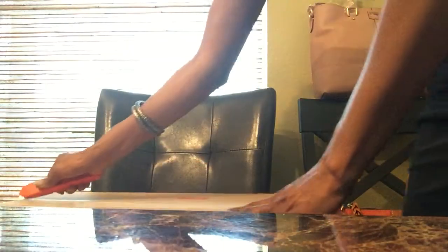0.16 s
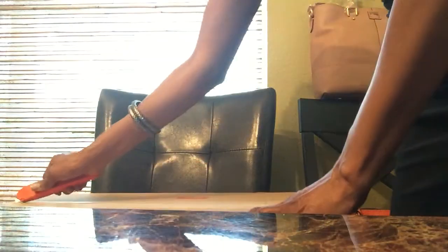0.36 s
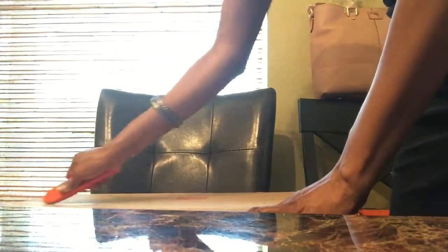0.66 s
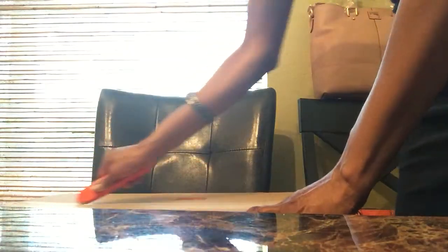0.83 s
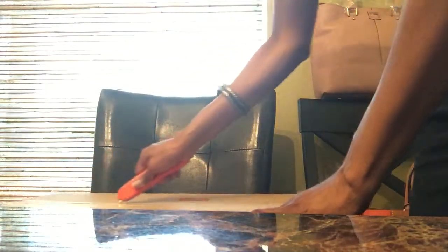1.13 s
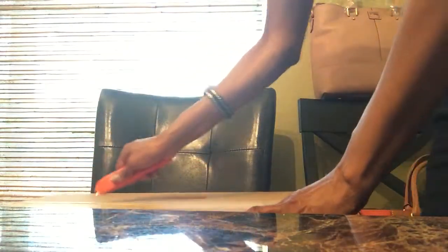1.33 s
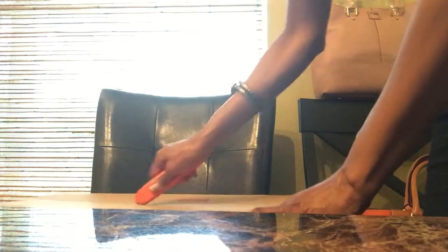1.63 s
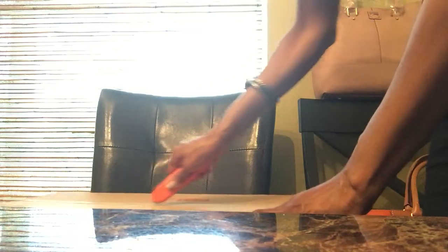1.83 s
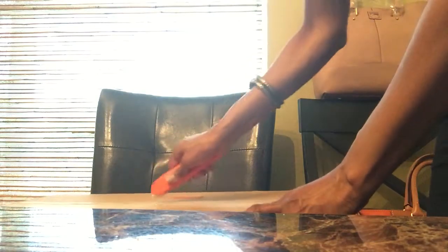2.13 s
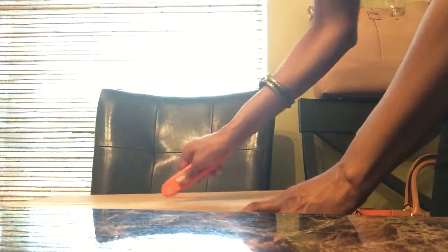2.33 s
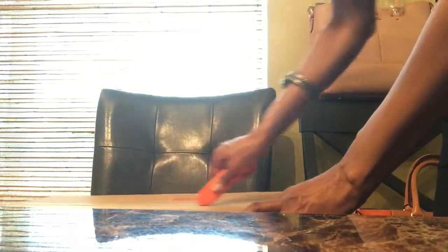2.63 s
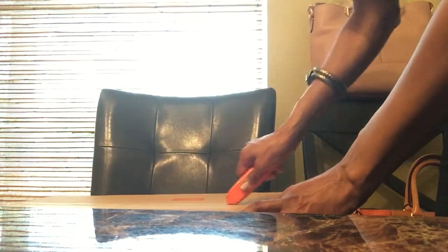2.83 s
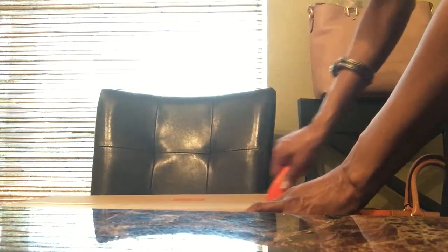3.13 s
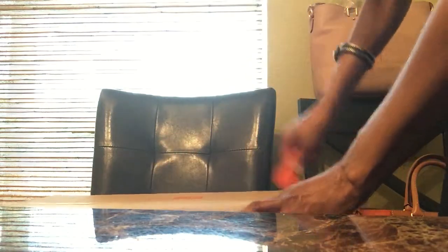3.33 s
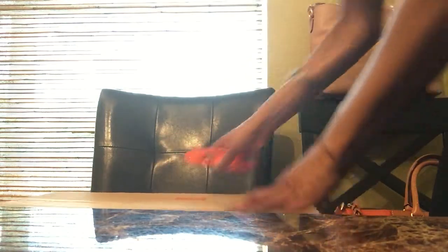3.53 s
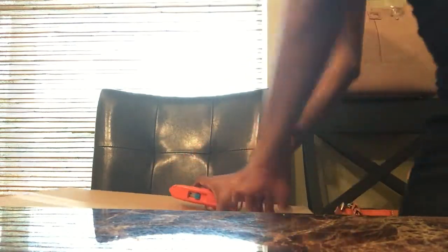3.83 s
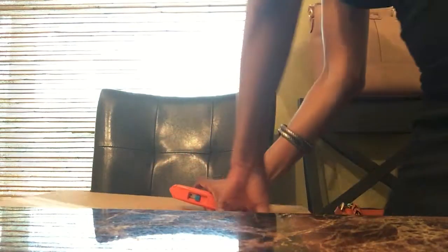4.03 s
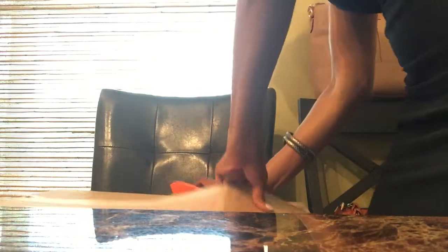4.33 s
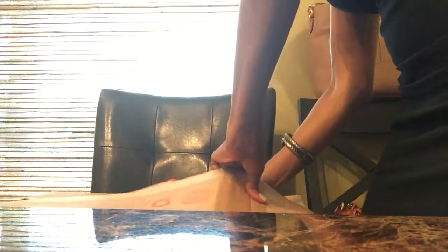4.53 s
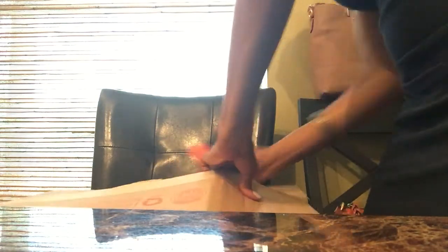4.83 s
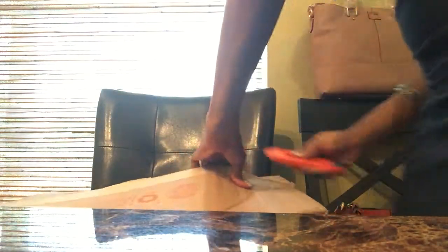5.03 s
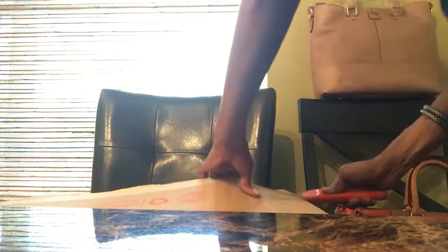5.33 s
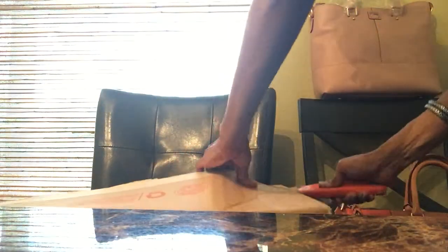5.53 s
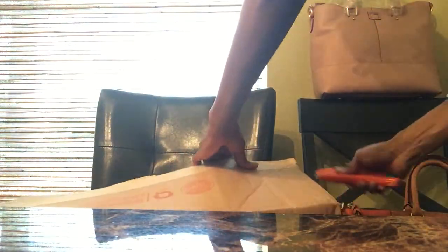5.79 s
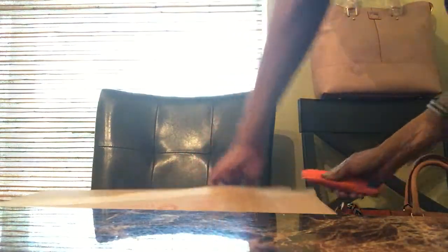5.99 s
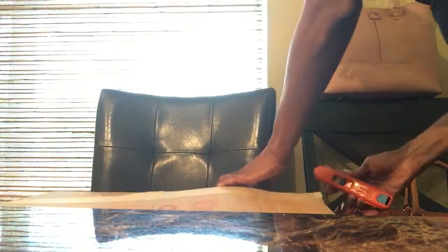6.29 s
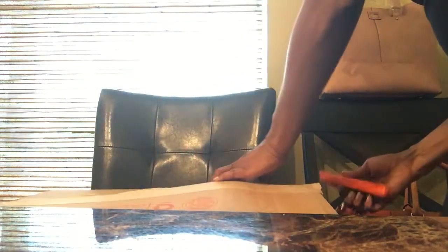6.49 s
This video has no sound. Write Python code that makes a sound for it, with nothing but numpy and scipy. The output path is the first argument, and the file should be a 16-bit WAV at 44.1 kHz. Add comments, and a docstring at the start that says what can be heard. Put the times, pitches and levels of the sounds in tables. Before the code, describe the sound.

In a small room with a faint hum, a nearby microphone picks up a blade ticking against packing tape and slicing along a cardboard box in several dry, scratchy pulls. After a crisp click from the cutter, the cardboard scuffs and flexes as it is tugged open, and the remaining tape gives way in loud, hollow snaps. The board drops with a thud, the cutter clicks again and a metal bangle clinks lightly.

```python
"""A box cutter rasps in strokes through the tape of a flat cardboard box on a stone table.
Hands then pull the box open: the last strands of tape snap, the board buckles, rubs and flops down.
The cutter's slider clicks and a metal bangle clinks on the wrist.
Heard from close by on one small microphone, in a small room with a low hum."""
import sys
import numpy as np
from scipy import signal
from scipy.fft import rfft, irfft, next_fast_len
from scipy.io import wavfile
from scipy.ndimage import uniform_filter1d, map_coordinates

SR = 44100
rng = np.random.default_rng(int(sys.argv[2]) if len(sys.argv) > 2 else 0)


def persist_wave(psi):
    """Save psi, clipped to +-1, as 16-bit WAV."""
    counts = np.round(np.clip(psi, -1, 1) * 32767).astype(np.int16)
    wavfile.write(sys.argv[1], SR, np.atleast_2d(counts).T)


N = 293425


def amp(db):
    """Decibels to gain."""
    return 10 ** (np.asarray(db) / 20)


def unit(x):
    """Scale to rms 1."""
    return x / np.sqrt(np.mean(x ** 2) + 1e-20)


def along(points, hz):
    """Read (frequency, value) points on a log frequency axis."""
    freqs, values = np.transpose(points)
    return np.interp(np.log(hz + 1), np.log(freqs + 1), values)


def wobble(rate):
    """A smooth random curve, rate knots a second."""
    knots = rng.standard_normal(int(N * rate / SR) + 4)
    return map_coordinates(knots, [np.arange(N) * rate / SR])


def add(track, start, sound):
    """Mix a sound into the track, start seconds in."""
    part = track[max(round(start * SR), 0):][:len(sound)]
    part += sound[:len(part)]


def colour(x, points, size=8192):
    """Minimum-phase filter through (frequency [Hz], gain [dB]) points."""
    cepstrum = irfft(np.log(amp(along(points, np.fft.rfftfreq(size, 1 / SR)))))
    cepstrum[1:size // 2] *= 2
    cepstrum[size // 2 + 1:] = 0
    return signal.fftconvolve(x, irfft(np.exp(rfft(cepstrum))))[:len(x)]


def resonance(x, hz, width_hz):
    """x through one resonance whose centre may move."""
    turn = np.exp(2j * np.pi * np.cumsum(hz * np.ones(len(x))) / SR)
    pole = np.exp(-np.pi * width_hz / SR)
    return 2 * (signal.lfilter([1 - pole], [1, -pole], x / turn) * turn).real


def ring(t, modes, scatter_db):
    """Damped modes, struck at new strengths every time."""
    return sum(amp(db + scatter_db * rng.standard_normal() - 60 * t / t60) * np.sin(2 * np.pi * hz * t)
               for hz, db, t60 in modes)


def burst(t, t60, points):
    """A dying cluster of tiny fractures, coloured, with the energy of 10 ms at rms 1."""
    x = colour(rng.choice([-1, 1], len(t)) * amp(-60 * t / t60), points)
    return x / np.linalg.norm(x) * np.sqrt(SR / 100)


def fibres(rate, spread_db):
    """Fibres parting: impulses at random moments with log-normal sizes."""
    impulses = (rng.random(N) < rate / SR) * rng.choice([-1, 1], N)
    return unit(impulses * amp(spread_db * rng.standard_normal(N)))


def moving_contact(x, depth_db, size=1024):
    """The contact moves over the sheet, so its narrow resonances come and go."""
    spectra = signal.stft(x, nperseg=size)[2]
    ripple = rng.standard_normal(spectra.shape)
    for axis, count in ((0, 4), (0, 3), (1, 10), (1, 5)):  # smooth over frequency, then time
        ripple = uniform_filter1d(ripple, count, axis)
    return unit(signal.istft(spectra * amp(depth_db * unit(ripple)), nperseg=size)[1][:N])


# Room tone at the microphone: (frequency [Hz], gain [dB])
ROOM_TONE_COLOUR = [(15, -50), (25, -18), (123, -4), (249, -15.5), (326, -5), (384, -21.5), (476, -25),
                    (714, -23), (2160, -30.5), (2910, -37.5), (3160, -33), (7310, -33), (9840, -39),
                    (14000, -43.5), (16000, -38)]
def room_tone():
    """Steady low hum and faint hiss of the room, behind everything else."""
    return amp(-61.5) * unit(colour(rng.standard_normal(N), ROOM_TONE_COLOUR))


# Reverberation of the small room: (frequency [Hz], t60 [s])
ROOM_DECAY = [(100, 0.27), (400, 0.31), (2000, 0.37), (7000, 0.35), (15000, 0.22)]
def room(x, wet_db, gap_s=0.005):
    """Direct sound from the table, plus a diffuse tail that changes as the hands move about."""
    out, block = x.copy(), SR // 3
    for start in range(0, N, block):
        hz, t, noise = signal.stft(rng.standard_normal(SR // 2), SR, nperseg=256)
        decay = amp(-60 * t / along(ROOM_DECAY, hz)[:, None])
        tail = signal.istft(noise * decay, SR, nperseg=256)[1]
        reverb = signal.fftconvolve(x[start:start + block], tail / np.linalg.norm(tail))
        add(out, start / SR + gap_s, amp(wet_db) * reverb)
    return out


# A sharp crack, of metal here and of tape below: (frequency [Hz], gain [dB])
CRACK_COLOUR = [(300, -25), (1350, -9), (2050, 1), (2900, 5), (4200, 4), (7500, 0), (9500, -11),
                (12000, -6.5), (15500, -13.5)]
# Ringing of the bangle: (frequency [Hz], level [dB], t60 [s])
BANGLE_MODES = [(2230, 8.5, 0.04), (4780, 0, .055), (5700, -7, .025), (6700, 2, 0.034), (7100, -5, .03),
                (7300, 1, 0.063), (9070, -3, 0.045), (10200, -3, .03), (11925, 1, .05), (12600, -12.5, .04),
                (13900, -4, .03)]
# Clinks on the wrist: (time [s], level [dB], favoured frequency [Hz])
BANGLE_CLINKS = [(3.8265, -42.5, 7630), (6.3617, -35, 4820), (6.37, -45.5, 7140), (6.386, -53, 5200),
                 (6.4705, -35.5, 7500), (6.5527, -37.5, 7600)]
def bangle_clinks():
    """Thin metal hoops touch; the point of contact favours some modes."""
    out, t = np.zeros(N), np.arange(SR // 4) / SR
    for start, db, hz in BANGLE_CLINKS:
        metal = amp(-23.5) * ring(t, BANGLE_MODES, scatter_db=2.5)
        metal += amp(-15) * burst(t, 0.012, CRACK_COLOUR)
        add(out, start, amp(db) * (metal + resonance(metal, hz, width_hz=1600)))
    return out


# The cutter's tick: (frequency [Hz], gain [dB])
TICK_COLOUR = [(300, -26.5), (1000, -19.5), (1600, -3.5), (2000, 6.5), (2700, -6), (4000, -0.5), (5500, -3),
               (7400, 1), (9500, -9), (12000, -3.5), (15500, -14.5)]
# Ringing of the cutter: (frequency [Hz], level [dB], t60 [s])
CUTTER_MODES = [(1980, 1.5, 0.25), (2090, 3, .22), (6360, -6, .14), (7560, -3, .18)]
# Clicks of the slider and plastic handle: (time [s], level [dB], treble before a set lift [dB])
CUTTER_CLICKS = [(3.4587, -29, -22), (3.4862, -11, -8), (5.245, -30, -33), (5.9888, -16.5, -25),
                 (6.5337, -38, -27), (6.5445, -31.5, -23.5), (6.5744, -35, -29), (6.6059, -37.5, -29)]
def cutter_clicks():
    """The cutter snaps: a sharp tick and a faint ring, each blow with its own brightness."""
    out, t = np.zeros(N), np.arange(SR // 2) / SR
    for start, db, treble_db in CUTTER_CLICKS:
        tick = amp(-13.5) * burst(t, 0.017, TICK_COLOUR)
        ringing = amp(-38) * ring(t, CUTTER_MODES, scatter_db=1.5)
        add(out, start, amp(db) * colour(tick + ringing, [(3500, 0.0032), (11000, treble_db + 9.5)]))
    return out


# Resonances of the box: (frequency [Hz], width [Hz], level [dB])
BOARD_MODES = [(229, 19, 2.5), (373.8, 49, 6), (622, 86, 3), (744, 200, -6.5), (972, 87, -3),
               (1114, 38, -12), (1262, 106, -4), (1506, 59, -13.5)]
def board(x):
    """The cardboard answers a force x with its damped resonances."""
    size = next_fast_len(len(x) + SR // 4)
    f = np.fft.rfftfreq(size, 1 / SR)
    response = sum(amp(db) * 1j * f * width / (hz * hz - f * f + 1j * f * width)
                   for hz, width, db in BOARD_MODES)
    return irfft(rfft(x, size) * response, size)[:len(x)]


# Scraped surface and deep flexing of the box: (frequency [Hz], gain [dB])
SCRAPE_COLOUR = [(600, -18.5), (1400, -1), (2000, 0.5), (2900, 3.5), (4200, -0.5), (7200, -2), (9500, -11),
                 (12000, -12.5), (15500, -14.5)]
FLEX_COLOUR = [(22, -54), (42, -21), (62, 0), (90, 1.5), (112, -3.5), (142, 0.5), (180, -10), (230, 1.5),
               (330, -9), (700, -50)]
# Hands shove, peel and drop the board; a negative fall keeps growing:
# (time [s], rise [s], fall by 30 dB [s], board [dB], scuff [dB], flex [dB])
HAND_SHOVES = [(2.385, 0.02, 0.4, -64, -72, -48.5), (2.48, 0.0046, 0.1, -48, -60, -33.5),
               (2.585, 0.03, 0.1, -44, -58, -40), (3.33, 0.05, 0.11, -53, -70, -41),
               (3.683, 0.01, 0.16, -39.5, -47.5, -39), (3.894, 0.005, 0.15, -37, -59, -33),
               (4.034, 0.0043, 0.16, -32.5, -44.5, -39), (4.117, 0.012, 0.1, -33.5, -36.5, -50),
               (4.15, 0.0046, 0.14, -34.5, -35.5, -36.5), (4.2, 0.17, 0.44, -40.5, -34, -41),
               (4.281, 0.0035, 0.0968, -22.5, -30, -33), (4.48, 0.079, 0.43, -39, -41.5, -39.5),
               (4.76, 0.07, 0.02, -51, -50.5, -62), (5.27, 0.05, 0.05, -50, -56, -59),
               (5.346, 0.005, 0.05, -34, -52, -54), (5.455, 0.05, 0.34, -45.5, -44.5, -44.5),
               (5.598, 0.026, 0.14, -24, -29.5, -30), (6.143, 0.014, 0.06, -41, -59, -45),
               (6.302, 0.013, 0.2, -36, -77, -52), (6.615, 0.02, -0.5, -55, -72, -55)]
def pulling_open(hold_from_s=3.66):
    """Tape peels and board rubs on board; every shove adds a swell."""
    t = np.arange(N) / SR
    held = (t > hold_from_s) * amp(3.5 * wobble(6.4))  # the held box rubs and flexes faintly
    gains = np.outer(amp([-66.5, -72, -61.5]), held)  # board, scuff, flex
    for start, rise, fall, *levels_db in HAND_SHOVES:
        swell = np.clip((t - start) / rise, 0, 1) * amp(-30 * np.maximum(t - start - rise, 0) / fall)
        gains += np.outer(amp(levels_db), swell)
    board_gain, scuff_gain, flex_gain = gains
    tear = fibres(rate=6000, spread_db=4) * amp(2.4 * wobble(73))
    sheet = moving_contact(tear, depth_db=2)
    scuff = amp(-7.5) * scuff_gain * unit(colour(sheet, SCRAPE_COLOUR))
    box_colour = [(250, 0), (390, 3.5), (500, 0), (780, -3.5), (1300, -1.5), (3000, -5), (8000, -11.5)]
    body = amp(-3) * board_gain * unit(colour(board(sheet), box_colour))
    flex = amp(-2) * flex_gain * unit(colour(fibres(rate=600, spread_db=3.5), FLEX_COLOUR))
    return scuff + body + flex


# Clack of the board: (frequency [Hz], gain [dB])
CLACK_COLOUR = [(250, -9.5), (700, 4.5), (980, -2.5), (1270, 0.5), (1600, -8.5), (2000, -2.5), (2700, -15),
                (5000, -28.5)]
# Blade stabs, tape snaps and knocks: (time [s], crack [dB], panel pitch [Hz], panel [dB])
BOX_SNAPS = [(1.4492, -22, 330, -47.5), (2.229, -28.5, 380, -45), (2.3624, -29, 210, -47.5),
             (2.4794, -24, 623, -31.5), (2.6114, -36, 230, -32.5), (2.9526, -40, 627, -38.5),
             (3.907, -39.5, 244, -34), (4.1505, -20.5, 696, -26.5), (4.181, -25, 300, -42),
             (4.2809, -18.5, 588, -27.5), (4.376, -5.5, 606, -17.5), (4.3854, -15, 664, -31.5),
             (4.5332, -14, 283, -24.5), (4.6297, -11.5, 276.5, -17.5), (4.9312, -42, 248, -47.5),
             (5.032, -49, 282, -44.5), (5.1098, -43.5, 242, -53.5), (5.2637, -30.5, 820, -42.5),
             (5.2753, -27.5, 202, -59), (5.3136, -27, 360, -45), (5.6252, -25, 270, -23),
             (5.6444, -40, 600, -27), (5.6572, -39, 375, -23), (5.698, -48, 240, -25),
             (6.03, -54, 350, -39)]
def box_snaps(panel_t60=0.029, swell_s=0.0013, lag_s=0.001):
    """Each release cracks, then the freed panel swings a few cycles and thuds on the table."""
    out, t = np.zeros(N), np.arange(SR // 4) / SR
    swing = amp(-60 * t / panel_t60) * (1 - np.exp(-t / swell_s))
    for start, crack_db, hz, panel_db in BOX_SNAPS:
        crack = amp(crack_db - 16) * burst(t, 0.014, CRACK_COLOUR)
        tape_ring = amp(2.5) * resonance(crack, hz=2080, width_hz=420)
        clack = amp((crack_db + panel_db) / 2 - 8) * burst(t, 0.039, CLACK_COLOUR)
        panel = amp(panel_db + 11) * np.sin(2 * np.pi * hz * t) * swing
        thud = amp(panel_db - 8) * burst(t, 0.055, FLEX_COLOUR)
        add(out, start, crack + tape_ring + clack)
        add(out, start + lag_s, panel + thud)
    return out


# The blade tip feels for the seam: (time [s], level [dB], tape pitch [Hz])
TIP_TAPS = [(0.0074, -42.5, 3100), (0.0433, -42.5, 3160), (0.0562, -45, 2940), (0.2463, -34.5, 2610),
            (0.2986, -37, 4180), (0.3378, -38.5, 3340), (0.3952, -32.5, 4200)]
def tip_taps():
    """Short dry scratches of the blade tip, each with the pitch of the tape and a faint knock of the box."""
    out, t = np.zeros(N), np.arange(SR // 8) / SR
    touch = 1 - np.exp(-t / 0.0015)  # the tip sinks in softly
    for start, db, hz in TIP_TAPS:
        scratch = burst(t, 0.054, SCRAPE_COLOUR)
        tape_ring = amp(10) * resonance(scratch, hz, width_hz=890)
        knock = board(burst(t, 0.035, [(300, -6), (1300, 0), (3000, -12)]))
        add(out, start, amp(db - 17) * touch * (scratch + tape_ring + knock))
    return out


def stroke(start, length, attack, rasp_db, change_db, dig_s, dig_db, board_db, rumble_db, bite_db):
    """Gains of the layers for one pull of the blade: attack, a sloping hold with one dig, release."""
    release_t60, hand_lag_s = 0.19, 0.033  # the blade slows to a stop; the hand drags the box on
    t = np.arange(N) / SR - start
    progress = np.clip(t / length, 0, 1)
    dig = np.exp(-((t + start - dig_s) / (0.17 * length)) ** 2)
    force = np.clip(t / attack, 0, 1) * amp(rasp_db + change_db * progress + dig_db * dig)
    blade = force * amp(-60 * np.maximum(t - length, 0) / release_t60)
    hand = force * amp(-60 * np.maximum(t - length - hand_lag_s, 0) / release_t60)
    body = blade * amp(board_db + 3.5 * (progress - 0.5))  # the hand bears down ever harder
    rumble = hand * amp(rumble_db + 5 * (progress - 0.5))
    bite = blade * amp(bite_db - 9.5 * progress)  # brightest in fresh tape, at the start
    fizz = blade * amp(-18.5 + 5.5 * dig)  # strongest where the blade digs in
    return np.array([blade, body, rumble, bite, fizz])


# Rasp of the edge, fizz of the tape, the box lying flat, the blade's drag: (frequency [Hz], gain [dB])
RASP_COLOUR = [(150, 1), (450, 9), (620, 11), (1400, -16.5), (1750, -2), (2100, 8), (2450, -4), (2850, 0),
               (3700, 2), (5200, -1.5), (8000, 3.5), (10000, -8), (15000, -4.5)]
FIZZ_COLOUR = [(5000, -25), (8300, -1.5), (10300, -5.5), (12300, -9), (15500, 1.5)]
FLAT_BOX_COLOUR = [(230, -4.5), (350, -2.5), (490, -15.5), (640, 0), (1000, -0.5), (1500, 0)]
DRAG_COLOUR = [(25, -24), (45, -6), (62, 1.5), (100, -2), (135, 1.5), (175, -9.5), (230, -9), (330, -26),
               (700, -53)]
# Pulls of the blade, close to the microphone; board, rumble and bite ride on the rasp's level:
# (time [s], length [s], attack [s], rasp [dB], change over the stroke [dB],
#  time of deepest dig [s], dig [dB], board [dB], rumble [dB], bite [dB])
BLADE_STROKES = [(0.45, 0.2, 0.06, -55, 8, 0.578, 8.5, -6.5, -26, 2),
                 (0.669, 0.52, 0.044, -43, -4.5, 0.79, 2, -1.5, -8, -12),
                 (1.447, 0.21, 0.004, -41, -3.5, 1.58, 2.5, -4, -5, -6.5),
                 (1.794, 0.23, 0.03, -42, -4.5, 1.925, 4, 1.5, 3, -16),
                 (2.226, 0.12, 0.0056, -48.5, -0.5, 2.31, 3, -3, -5, -9),
                 (2.478, 0.37, 0.005, -48.5, -1, 2.63, 7, 1, -4, -15),
                 (2.879, 0.22, 0.024, -54.5, 2.5, 2.95, 1, 4.5, -1, -16),
                 (3.11, 0.22, 0.067, -44, -3, 3.22, 1, 6.5, -1, -16)]
def cutting(tape_hz=2780, tape_wander=0.045):
    """The blade parts tape and fibres; its uneven drag shakes the box, which lies damped on the table."""
    rasp_gain, body_gain, rumble_gain, bite_gain, fizz_gain = sum(stroke(*row) for row in BLADE_STROKES)
    catch = amp(1.68 * wobble(70) + 0.8 * wobble(260))  # the edge catches and slips
    tear = fibres(rate=7000, spread_db=2.5) * catch
    sheet = moving_contact(tear, depth_db=3)
    pitch_hz = tape_hz * (1 + tape_wander * wobble(12))  # the taut tape rings ahead of the blade
    taut_tape = unit(resonance(tear, pitch_hz, width_hz=280))
    sing = amp(-11 + 3.5 * wobble(8.02)) * rasp_gain * taut_tape
    bite = bite_gain * unit(colour(sheet, [(2500, -11.5), (4200, -2), (6200, -4.5), (9000, -21.5)]))
    rasp = amp(-4) * rasp_gain * unit(colour(sheet, RASP_COLOUR))
    fizz = fizz_gain * unit(colour(tear, FIZZ_COLOUR))
    body = amp(-2) * body_gain * unit(colour(board(sheet), FLAT_BOX_COLOUR))
    rumble = amp(-3) * rumble_gain * unit(colour(fibres(rate=390, spread_db=3.5), DRAG_COLOUR))
    return rasp + fizz + sing + bite + body + rumble


def scene():
    """The work on the table and the room around it, in mono at the microphone."""
    rubbing = room(cutting() + pulling_open(), wet_db=-6.5)
    knocks = room(box_snaps() + tip_taps(), wet_db=-5)
    clicks = room(cutter_clicks() + bangle_clinks(), wet_db=-4)
    return (rubbing + knocks + clicks + room_tone())[None]


def record(dry, low_cut_hz=50, top_hz=15600):
    """The small microphone loses deep bass and keeps nothing above its band limit."""
    thin = signal.sosfilt(signal.butter(3, low_cut_hz, "high", fs=SR, output="sos"), dry)
    size = next_fast_len(N + SR // 4)
    in_band = np.fft.rfftfreq(size, 1 / SR) < top_hz
    return irfft(rfft(thin, size) * in_band, size)[:, :N]


dry = scene()
out = record(dry)
persist_wave(out)
```